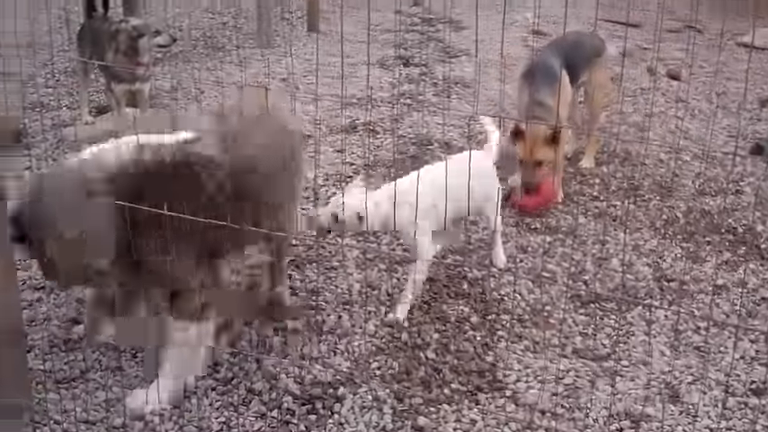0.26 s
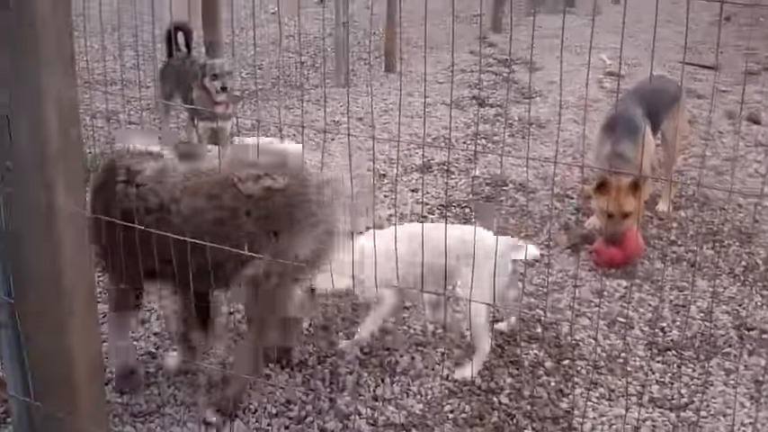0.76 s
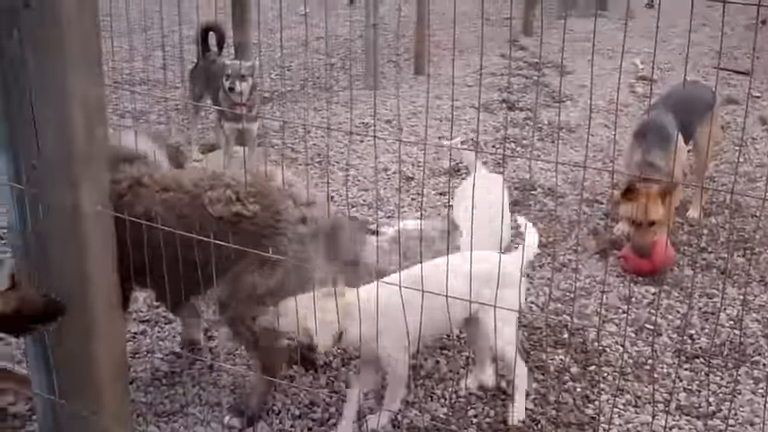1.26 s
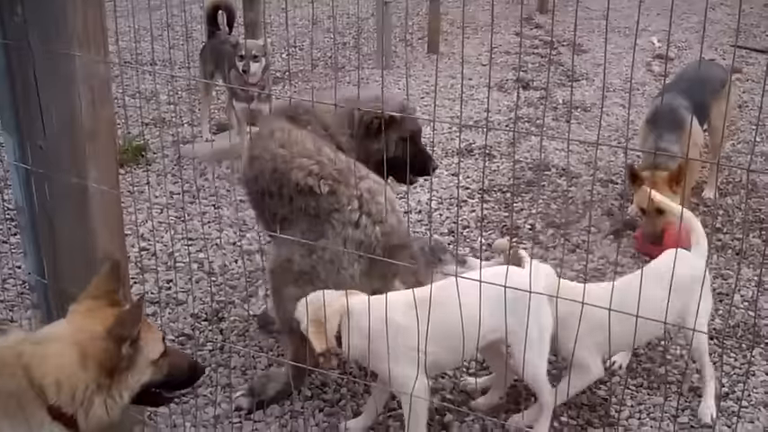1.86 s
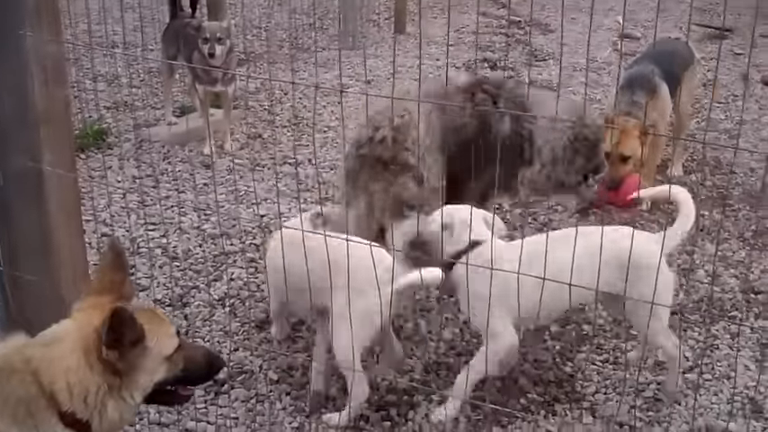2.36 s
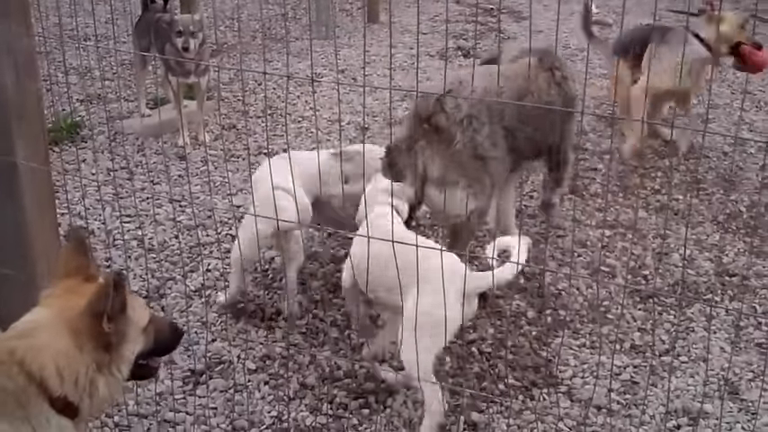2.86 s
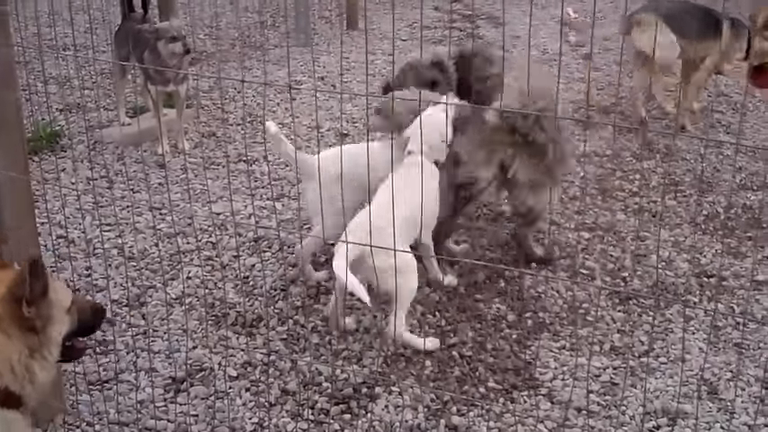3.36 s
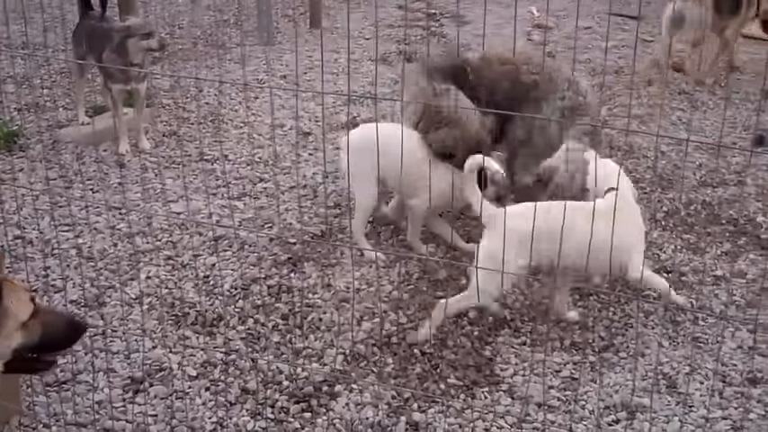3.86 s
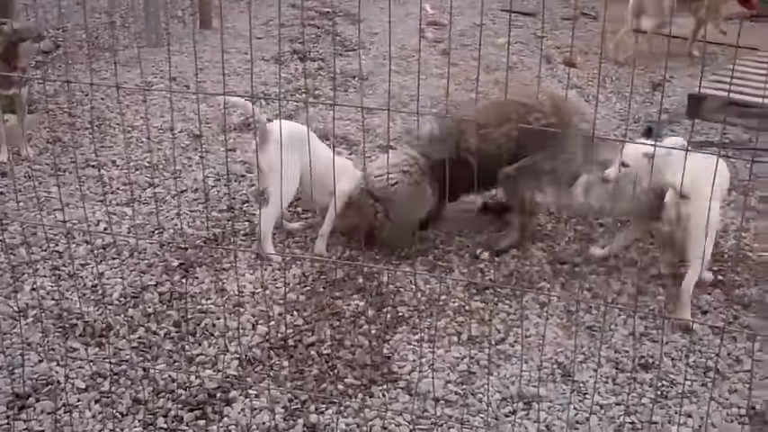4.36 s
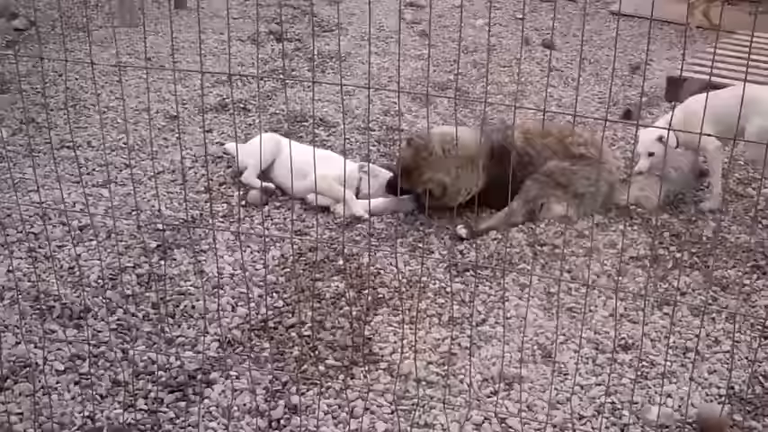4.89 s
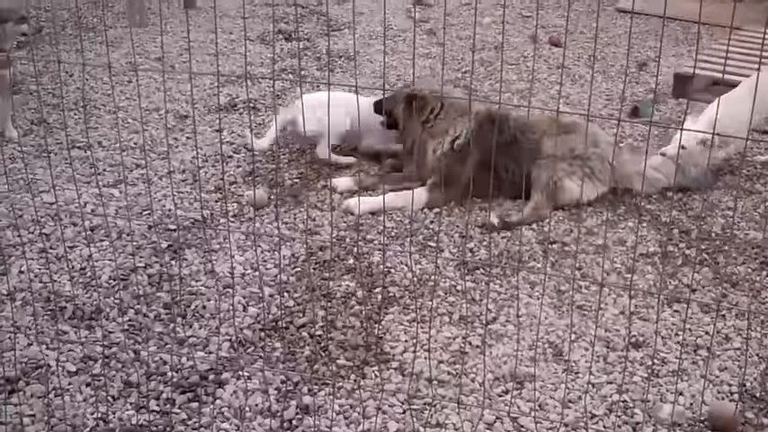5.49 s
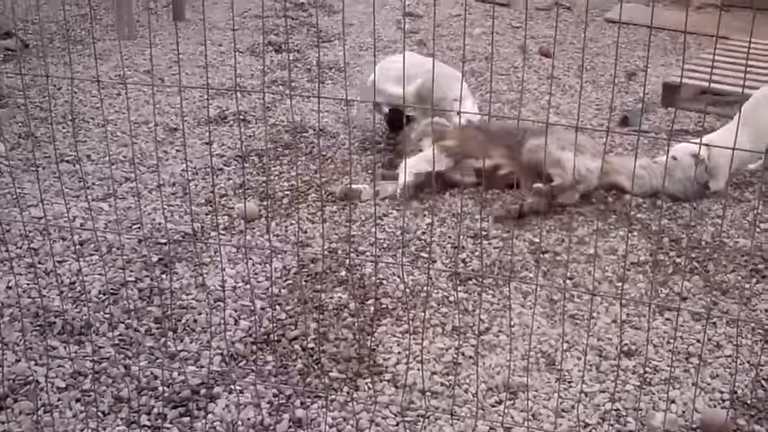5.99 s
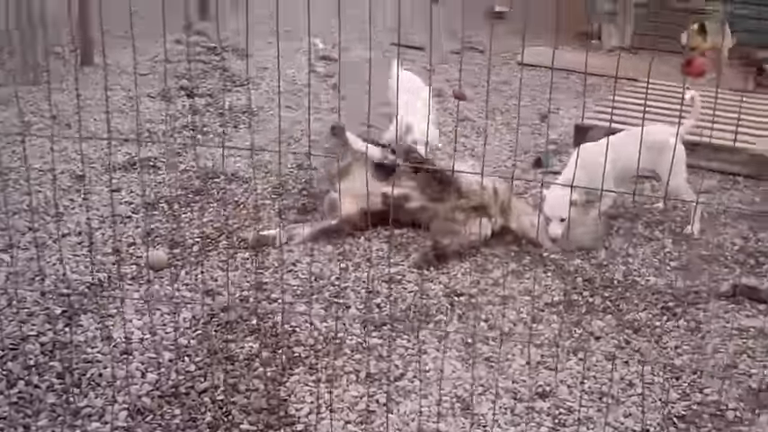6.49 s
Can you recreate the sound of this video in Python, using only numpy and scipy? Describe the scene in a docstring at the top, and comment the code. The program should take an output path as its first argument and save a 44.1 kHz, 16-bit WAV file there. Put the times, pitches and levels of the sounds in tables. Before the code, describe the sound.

Paws scrape and scatter loose gravel in an outdoor pen as young dogs wrestle with a bigger one. A short rough growl comes early, followed by tiny grunts, faint whimpers and a lower, quieter growl. The stones keep ticking and sliding, with soft body thuds and a thin squeak later. A quick yip and a louder, higher yelp come near the end. A handheld stereo microphone catches faint distant air and light wind, its left side brighter.

```python
"""Loose gravel clacks and slides under the paws of young dogs wrestling in an outdoor pen.
The stones are short ringing ticks over coloured noise, gathered into slips and steps.
A big dog growls twice and pups grunt, whimper, yip and yelp: pulses and puffs through a throat.
A thin squeak is a gliding whistle; distant air and light wind at two microphone ports are noise."""
import sys
import numpy as np
from scipy import signal
from scipy.io import wavfile
from scipy.ndimage import uniform_filter1d

SR = 44100
rng = np.random.default_rng(int(sys.argv[2]) if len(sys.argv) > 2 else 0)


def generate_wav(signal):
    """Clip the signal to [-1, 1] and save it as 16-bit WAV at the path in sys.argv[1]."""
    frames = np.transpose(np.atleast_2d(signal))
    scaled = np.clip(frames, -1, 1) * 32767
    pcm = np.round(scaled).astype(np.int16)
    wavfile.write(sys.argv[1], SR, pcm)


N = 297213  # length of the scene in samples

# colour of small stones striking, as the left port hears them: (frequency [Hz], level [dB])
STONE_COLOUR = [(590, -62), (1000, -21), (1600, -20.5), (2100, -14), (4600, -3.5), (5500, -1), (8300, 2),
                (9500, -1), (11200, -18), (12800, -27), (14600, -53)]
# colour of the deeper bed of gravel shifting: (frequency [Hz], level [dB])
BED_COLOUR = [(80, -43), (200, -15), (450, -16), (800, -11), (1500, -4), (2500, -1), (4000, -0.5),
              (7000, -33)]
# resonances of a pup's throat: (frequency [Hz], width [Hz], level [dB], power of the mouth opening it follows)
PUP_RESONANCES = [(500, 290, -4, 0.96), (860, 250, 8.5, 0.96), (1380, 160, -1, 1), (1800, 280, -3, 1)]


def amp(db):
    """Turns decibels into a plain factor."""
    return 10 ** (np.asarray(db) / 20)


def evened(x):
    """Scales a sound to an rms of 1."""
    return x / np.sqrt(np.mean(x ** 2) + 1e-20)


def peaked(rows):
    """Scales each row to a peak of 1."""
    return rows / abs(rows).max(axis=1, keepdims=True)


def read(points, hz):
    """Reads a curve between its points, along a logarithmic frequency scale."""
    f, value = np.transpose(points)
    return np.interp(np.log(hz + 1), np.log(f + 1), value)


def columns(rows, t):
    """Reads every column of a table at the times t; the first column holds its own times."""
    s, *rest = np.transpose(rows)
    return [np.interp(t, s, column) for column in rest]


def add(mix, s, sound):
    """Adds a sound to the mix from s seconds on."""
    part = mix[round(s * SR):][:len(sound)]
    part += sound[:len(part)]


def coloured(x, points):
    """Gives a sound the wanted spectrum along its last axis, with a filter that never acts early."""
    gain_db = np.maximum(read(points, abs(np.fft.fftfreq(8192, 1 / SR))), -100)
    log_gain = np.log(amp(gain_db))
    taps = np.fft.ifft(np.exp(np.conj(signal.hilbert(log_gain)))).real[:min(4096, x.shape[-1])]
    filtered = signal.oaconvolve(np.atleast_2d(x), taps[None], axes=1)
    return filtered[:, :x.shape[-1]].reshape(x.shape)


def chance(top_hz):
    """Slow random curve of rms 1."""
    low_pass = signal.butter(2, top_hz, fs=SR, output="sos")
    return evened(signal.sosfilt(low_pass, rng.standard_normal(N)))


def resonate(x, hz, width):
    """Shifts the frequency hz down to zero, smooths, and shifts back: a resonance of gain 1."""
    turn = np.exp(2j * np.pi * np.cumsum(hz * np.ones(len(x))) / SR)
    r = np.exp(-np.pi * width / SR)
    smooth = signal.lfilter([1 - r], [1, -r], x / turn + 1e-18)
    return 2 * (turn * smooth).real


def air():
    """Distant outdoor wash: steady coloured noise that rises and falls."""
    # colour of the wash: (frequency [Hz], level [dB])
    wash_colour = [(40, -35), (100, -4), (200, -10), (400, -11.5), (700, -3), (1400, -16), (3000, -7.5),
                   (8800, -5.5), (11400, -30), (14000, -73), (15000, -61)]
    # rise and fall of the wash, before its overall lift: (time [s], level [dB])
    swell = [(0.0, -75), (0.62, -67.5), (0.81, -76.5), (1.2, -76), (1.55, -68), (1.86, -80), (2.68, -73.5),
             (2.94, -81.5), (3.2, -78.5), (4.2, -77.5), (4.36, -83.5), (4.6, -77.5), (5.11, -70),
             (5.4, -71.5), (5.55, -78.5), (5.75, -76.5), (6.0, -73.5), (6.15, -82.5), (6.29, -72.5),
             (6.61, -67), (6.74, -67)]
    lift_db = 13
    [swell_db] = columns(swell, np.arange(N) / SR)
    return amp(swell_db + lift_db) * evened(coloured(rng.standard_normal(N), wash_colour))


def wind():
    """Lumpy low pressure, mostly unrelated at the two ports."""
    # strength of the gusts, before each port's own gain: (time [s], level [dB])
    gusts = [(0, -82), (.45, -82), (.81, -82), (1.0, -84.5), (1.93, -77), (2.05, -74.5), (2.83, -70.5),
             (2.95, -80), (3.77, -82), (4.2, -68.5), (4.32, -83), (5.1, -75.5), (5.52, -82), (6.03, -72),
             (6.15, -81), (6.27, -64), (6.38, -73), (6.53, -66), (6.59, -73), (6.68, -52), (6.74, -69)]
    # colour of the wind: (frequency [Hz], level [dB])
    gust_colour = [(15, -1), (40, -2), (65, -9), (100, -17), (200, -38), (400, -70)]
    [gust_db] = columns(gusts, np.arange(N) / SR)

    def port_noise():
        """Low noise whose level wanders slowly."""
        return evened(coloured(rng.standard_normal(N), gust_colour)) * amp(2.7 * chance(2.5))

    left, right = port_noise(), port_noise()
    return amp(gust_db) * np.array([amp(3.5) * left, amp(-2) * (right + .1 * left)])


def squeak():
    """A thin, slightly fuzzy whistle that wavers downward: a sine with narrow noise around it."""
    # path of the whistle: (time [s], pitch [Hz], level [dB])
    path = [(4.848, 8850, -56), (4.862, 8420, -44), (4.872, 7980, -45), (4.897, 8360, -47),
            (4.91, 8040, -39), (4.922, 8050, -52), (4.945, 8100, -64)]
    t = np.arange(path[0][0], path[-1][0], 1 / SR)
    hz, db = columns(path, t)
    whistle = np.sin(2 * np.pi * np.cumsum(hz) / SR)
    fuzz = evened(resonate(rng.standard_normal(len(t)), hz, 260.))
    return t[0], amp(db) * (whistle + .3 * fuzz) * signal.windows.tukey(len(t), .2)


def voice(rough, low_db, chest_db, rows, throat):
    """Uneven pulses and puffs of noise pass a throat that opens and shuts; the chest adds a plain tone."""
    low_sinks = .75  # dB lost by the lowest resonance per dB of effort: harder calls move upward
    usual_effort_db, shimmer_db = -52, 1.6  # shimmer: spread in strength from pulse to pulse
    t = np.arange(rows[0][0], rows[-1][0], 1 / SR)
    effort_db, hz, mouth = columns(rows, t)
    extra_db = effort_db - usual_effort_db
    rough, low_db = np.clip(rough, 0, 1), low_db - low_sinks * extra_db

    wobble = uniform_filter1d(rng.standard_normal(len(t)), 300)
    turns = np.cumsum(hz * (1 + 3.0 * rough * wobble)) / SR  # pulses counted so far
    folds = sum(np.cos(2 * np.pi * k * turns) * (k * hz < 4000) for k in range(1, 40))
    folds = folds * amp(shimmer_db * rng.standard_normal(100)[(turns + .5).astype(int)])
    puffs = np.exp(-(turns % 1) / .3) * rng.standard_normal(len(t))
    drive = (1 - rough) * folds * np.sqrt(hz) / 45 + 3 * rough * evened(puffs)

    out = np.zeros(len(t))
    for k, (f, width, db, power) in enumerate(throat):
        centre = f * mouth ** power
        band = resonate(resonate(drive, centre, 1.7 * width), centre, 1.48 * width)
        out += (-1) ** k * amp(db + low_db * (k == 0)) * band
    # a head radiates little deep bass
    out = signal.sosfilt(signal.butter(4, 100, "high", fs=SR, output="sos"), out)
    chest = amp(chest_db - .5 * low_sinks * extra_db) * np.sin(2 * np.pi * np.cumsum(hz) / SR)
    return t[0], amp(effort_db) * (evened(out) + chest) * signal.windows.tukey(len(t), .08)


def short_call(low_db, chest_db, row, throat):
    """A brief voice: one swell in level over a straight glide in pitch."""
    start, length, db, first_hz, last_hz, mouth, rough = row
    swell_db = 15  # how far the ends lie under the peak
    rows = [(start + u * length, db - swell_db * (2 * u - 1) ** 2,
             first_hz + u * (last_hz - first_hz), mouth) for u in np.linspace(0, 1, num=7)]
    return voice(rough, low_db, chest_db, rows, throat)


def whimpers():
    """High short calls through a pup's throat."""
    # (start [s], length [s], peak effort [dB], first pitch [Hz], last pitch [Hz],
    #  mouth opening [factor], roughness [0-1])
    calls = [(1.405, 0.033, -62.5, 1474, 1460, 1.9, .2), (1.505, 0.031, -65, 1440, 1380, 1.9, .2),
             (6.172, 0.03, -63, 1444, 1260, 1.5, 0.52)]
    return [short_call(-25., -40., row, PUP_RESONANCES) for row in calls]


def grunts():
    """Low short calls through a shut throat, with a stronger chest tone."""
    # (start [s], length [s], peak effort [dB], first pitch [Hz], last pitch [Hz],
    #  mouth opening [factor], roughness [0-1])
    calls = [(.79, 0.022, -60, 276, 267, 1.13, 0.37), (1.0, 0.028, -68, 266, 344, 0.83, 0.37),
             (1.73, 0.023, -58.5, 217, 203, 1, 0.37), (4.538, 0.081, -59.5, 199, 97, 1.05, .14)]
    # (frequency [Hz], width [Hz], level [dB], power of the mouth opening it follows)
    shut_throat = [(273, 146, 19, 0.75), (650, 130, -22, 1)]
    return [short_call(-5., -10., row, shut_throat) for row in calls]


def yips():
    """A pup's quick call: pulses at a few hundred hertz through its small throat."""
    # (roughness [0-1], lowest resonance over the others [dB], chest tone [dB], rows of
    #  (time [s], effort [dB], pitch [Hz], mouth opening [factor]))
    calls = [(.29, -10, -40, [(6.368, -68, 312, 1.42), (6.386, -51, 310, 1.42), (6.4, -52, 305, 1.25),
             (6.413, -50, 300, 1.38), (6.435, -66, 298, 1.38)]), ]
    return [voice(*call, PUP_RESONANCES) for call in calls]


def yelps():
    """A louder, higher call whose mouth opens wide: its resonances climb and fall with the opening."""
    # (roughness [0-1], lowest resonance over the others [dB], chest tone [dB], rows of
    #  (time [s], effort [dB], pitch [Hz], mouth opening [factor]))
    calls = [(.075, 5.2, -40, [(6.462, -59, 392, 0.55), (6.472, -44.5, 392, 0.82), (6.49, -40.5, 414, 0.82),
             (6.504, -40.5, 440, 1.05), (6.526, -40, 444, 1.1), (6.538, -44, 402, 0.87),
             (6.548, -56, 394, 1.17), (6.556, -75, 400, .92)])]
    # (frequency [Hz], width [Hz], level [dB], power of the mouth opening it follows)
    yelp_throat = [(430, 200, 8, .5), (880, 150, 9, 1), (2000, 150, -3, 1.5)]
    return [voice(*call, yelp_throat) for call in calls]


def growls():
    """A big dog's low calls: slow pulses through a long throat."""
    # (roughness [0-1], lowest resonance over the others [dB], chest tone [dB], rows of
    #  (time [s], effort [dB], pitch [Hz], mouth opening [factor]))
    calls = [(0.38, -12, -11.5, [(0.4, -62, 104, 1.0), (0.42, -54, 123, 1.0), (0.448, -55, 151, 1.0),
             (0.462, -50, 162, 0.95), (0.486, -41.5, 162, 1.04), (0.514, -51, 165, 0.95),
             (0.532, -57, 158, 1.1), (0.56, -54, 104, 1.2), (0.585, -60, 101, 1.1), (0.632, -55, 112, 0.9),
             (0.65, -49, 117, 0.92), (0.672, -57, 107, 0.87), (0.688, -56, 99, .85),
             (0.72, -72, 92, 0.84)]), (0.07, -9, -40, [(1.365, -71, 80, 1.05), (1.412, -60, 85, 1.06),
             (1.45, -61, 80, 1.05), (1.525, -62, 79, 1.04), (1.548, -57, 83.5, 1.05), (1.57, -61, 83, 1.04),
             (1.62, -57.5, 78, 1.05), (1.645, -62, 70, 1.05), (1.68, -72, 60, 1.05)])]
    # (frequency [Hz], width [Hz], level [dB], power of the mouth opening it follows)
    big_throat = [(185, 100, 3.5, .5), (790, 130, 2.5, 1), (1090, 120, -1, .3), (590, 84, -10, 1)]
    return [voice(*call, big_throat) for call in calls]


def thuds():
    """A paw or body lands: a soft push, then a slower pull back that dies away."""
    # (time [s], level [dB], frequency that sets the speed [Hz])
    landings = [(1.176, -49, 75), (4.926, -38, 700), (5.353, -33, 500)]
    out = np.zeros(N)
    for s, db, hz in landings:
        u = np.arange(0, 8, 2 * np.pi * hz / SR)
        add(out, s, amp(db) * (1 - u) * np.exp(-u) * np.minimum(4 * u, 1))
    return out


def stone(hz, noise, t60=.005, ring=.6):
    """A wide tick and a short ring at the stone's own pitch, falling by 60 dB in t60 seconds."""
    t = np.arange(noise.shape[-1]) / SR
    return (noise + ring * 2 * np.sin(2 * np.pi * hz * t)) * amp(-60 * t / t60)


def clacks():
    """Each stone ticks, rings, knocks on the bed and scatters a few neighbours."""
    # single stones that strike clearly: (time [s], level [dB], ring pitch [Hz])
    strikes = [(0.0118, -30.5, 9100), (0.0311, -30.0, 8900), (0.08, -32.5, 5510.0), (0.157, -34, 8310.0),
               (0.2171, -19, 9000), (0.2511, -30, 8600), (0.2841, -26.6, 6680.0), (0.3383, -21, 9500),
               (0.3843, -40, 7880.0), (0.4339, -15.5, 6700), (0.46, -22, 8240), (0.643, -25.1, 9260.0),
               (0.6546, -25, 8750), (0.6647, -21, 7620.0), (0.6732, -23, 8800), (0.724, -30, 9430.0),
               (0.7895, -37, 4350.0), (0.8072, -22.5, 8800), (0.823, -22, 9350.0), (0.8419, -31, 8570.0),
               (0.8628, -25, 8100), (0.8813, -25, 7500), (0.943, -27, 8440.0), (1.1822, -16.5, 6430),
               (1.2163, -23.5, 5300), (1.2706, -31.5, 6940), (1.3237, -33, 8350.0), (1.3522, -26, 8480.0),
               (1.3745, -37, 8140.0), (1.39, -35, 6890.0), (1.4828, -24, 6980.0), (1.4972, -29.5, 8230.0),
               (1.5198, -21, 8010.0), (1.5247, -20, 8400), (1.5705, -21, 8050.0), (1.575, -23.7, 7450),
               (1.6074, -24, 9650.0), (1.6293, -22, 8350), (1.6536, -19, 7870), (1.6631, -25, 5500),
               (1.6903, -25.5, 6290.0), (1.7313, -27, 8830.0), (1.747, -34, 7450.0), (1.762, -23, 8530.0),
               (1.7704, -21, 7750), (1.895, -18.5, 8300), (2.0655, -29, 8570.0), (2.0968, -22.5, 9260.0),
               (2.1273, -26, 8700.0), (2.159, -23.5, 7100), (2.186, -27, 8530.0), (2.1977, -28.9, 9260.0),
               (2.2032, -25.4, 7410.0), (2.2146, -28, 7670.0), (2.2254, -27, 6330.0), (2.2473, -33, 8610.0),
               (2.2799, -24, 8030), (2.2897, -30, 8010.0), (2.4017, -25.5, 7020.0), (2.4408, -23, 7840.0),
               (2.4624, -24, 7490.0), (2.4781, -19, 7000), (2.5087, -25.5, 9130.0), (2.5271, -33, 8740.0),
               (2.5449, -30.4, 8230.0), (2.55, -34, 7320.0), (2.5587, -28.6, 8180.0), (2.5688, -24, 9260.0),
               (2.5764, -20.5, 8150), (2.5826, -21, 5940.0), (2.6103, -24, 9220.0), (2.621, -30, 7320.0),
               (2.6346, -24.8, 9470.0), (2.7011, -33, 9150), (2.709, -20.5, 9170.0), (2.723, -22.2, 6680.0),
               (2.771, -31, 8790.0), (2.7795, -33, 7920.0), (2.7873, -34, 6980.0), (2.804, -25.1, 8350.0),
               (2.8144, -20, 8600), (2.8214, -21, 8310.0), (2.828, -27, 7500), (2.8402, -28, 5600.0),
               (2.872, -23, 5560.0), (2.944, -27, 8400), (2.9695, -28, 7670.0), (2.992, -31, 5510.0),
               (3.0115, -31, 8600), (3.054, -32, 9470.0), (3.0593, -20, 9730), (3.1706, -26, 9300),
               (3.2428, -25.5, 9700), (3.2992, -21.5, 8740.0), (3.359, -27, 9170.0), (3.3709, -21.3, 8050),
               (3.401, -24, 8480.0), (3.4794, -31, 8870.0), (3.5304, -33, 9200), (3.6375, -32, 7490.0),
               (3.6506, -28, 8200), (3.709, -34, 8830.0), (3.725, -34, 9560.0), (3.7631, -23.7, 5430),
               (3.77, -28, 6980.0), (3.8213, -27.5, 8270.0), (3.9038, -33, 6460.0), (3.9544, -31, 9100),
               (4.0189, -19.5, 7550), (4.0518, -26.8, 8570.0), (4.0645, -32, 9000.0), (4.071, -24, 6980.0),
               (4.0952, -34.5, 8180.0), (4.1133, -27, 7360.0), (4.1175, -23.8, 9100), (4.1534, -23, 7880.0),
               (4.1713, -23, 8870.0), (4.2124, -35, 8270.0), (4.2218, -26.7, 4820.0), (4.2312, -20, 9250),
               (4.6134, -37, 9100), (4.657, -30.5, 8100), (4.8282, -31.6, 8790.0), (4.869, -20.5, 6240.0),
               (4.9726, -22, 8900), (4.9987, -29.6, 6930.0), (5.0159, -21, 8700), (5.0453, -23, 9000),
               (5.0642, -30.0, 8530.0), (5.099, -25, 8300), (5.1318, -27, 4400), (5.1538, -34, 8740.0),
               (5.1847, -27, 9130.0), (5.2619, -25.5, 6500), (5.2774, -28, 8050.0), (5.3452, -27, 8200),
               (5.3556, -18.5, 9100), (5.5431, -26, 8960.0), (5.5637, -37, 8140.0), (5.5782, -30.2, 7970.0),
               (5.5968, -31, 8350.0), (5.6995, -28.5, 9000), (5.9042, -27, 9520.0), (5.9373, -22, 8940),
               (5.9597, -32, 7750.0), (5.9836, -32, 8740.0), (5.9967, -29, 9260.0), (6.0078, -27, 7490.0),
               (6.014, -27.2, 8830.0), (6.0771, -26, 7100), (6.3282, -24, 8900), (6.4176, -29.5, 8250),
               (6.5621, -24.5, 8500), (6.7005, -30, 8740.0), (6.718, -28, 6560)]
    s, db, hz = np.transpose(strikes)[:, :, None]
    hit, scatter = rng.standard_normal((2, len(strikes), 900))
    neighbours = amp(-12) * stone(hz, scatter, t60=.02, ring=0)
    ring = coloured(stone(hz, hit, t60=.0026, ring=.45) + neighbours, STONE_COLOUR)
    knock = coloured(stone(hz / 3, scatter, t60=0.0077, ring=0.17), BED_COLOUR)
    tick = coloured(stone(hz, hit, t60=0.0016, ring=0), [(8000., -26.5), (11000., 3.0), (14000., -24.5)])
    sounds = amp(db) * (amp(-18.0) * peaked(tick) + peaked(ring) + amp(-21.5) * peaked(knock))
    out = np.zeros(N)
    for start, sound in zip(s[:, 0], sounds):
        add(out, start, sound)
    return out


def lulls():
    """Gain of the ground, which drops quickly and returns after each lull."""
    # the ground falls briefly quiet: (start [s], length [s], level [dB])
    dips = [(4.294, 0.097, -4), (5.358, 0.061, -5.5), (5.686, 0.032, -1.5)]
    t = np.arange(N) / SR
    dip_db = sum(db * ((t > s) & (t < s + length)) for s, length, db in dips)
    return amp(uniform_filter1d(dip_db, 300))


def stirring(t, between_db):
    """Each step swells and dies away, with a short hold, in straight dB slopes; their powers add."""
    # a paw lands or scrapes: (time of the loudest moment [s], stirring [dB], length [s])
    steps = [(0.01, -46.5, 0.06), (0.082, -41.5, 0.025), (0.154, -43.5, 0.18), (0.22, -33.5, 0.1),
             (0.29, -43, 0.96), (0.47, -38.5, 0.24), (0.658, -38.5, 0.21), (0.761, -50.5, 0.22),
             (0.833, -41, 0.19), (0.965, -47.5, 0.15), (1.097, -42.5, 0.19), (1.188, -48, 0.061),
             (1.358, -42, 0.24), (1.417, -40, 0.042), (1.553, -37.5, 0.34), (1.799, -41.5, 0.3),
             (1.902, -52.5, 0.53), (2.06, -37, 0.085), (2.148, -44, 0.31), (2.209, -34, 0.063),
             (2.276, -44.5, 0.14), (2.337, -44.5, 0.21), (2.405, -38, 0.12), (2.474, -36.5, 0.076),
             (2.582, -31, 0.097), (2.607, -36, 0.12), (2.738, -39, 0.36), (2.845, -44.5, 0.21),
             (3.043, -40.5, 0.21), (3.16, -42.5, 0.054), (3.24, -42.5, .06), (3.282, -37, 0.058),
             (3.295, -46.5, 0.57), (3.401, -32.5, 0.056), (3.589, -44, 0.4), (3.768, -42.5, 0.12),
             (4.024, -41, 0.19), (4.148, -42.5, 0.57), (4.228, -35, 0.082), (4.442, -43.5, 0.28),
             (4.715, -46, 0.38), (4.855, -50.5, 0.64), (4.976, -42.5, 0.019), (5.039, -40, 0.15),
             (5.087, -45.5, 0.13), (5.17, -41.5, 0.35), (5.27, -47, 0.36), (5.336, -40, 0.14),
             (5.441, -41.5, 0.11), (5.49, -46, .2), (5.6, -41, 0.1), (5.89, -44.5, 0.26),
             (5.956, -43, 0.32), (6.007, -55, 0.091), (6.065, -44, 0.083), (6.238, -52, 0.028),
             (6.327, -51, 0.031), (6.558, -45.5, 0.058), (6.585, -62, .4), (6.648, -42, 0.099),
             (6.664, -45.5, .08), (6.7, -48, .04), (6.72, -48, .1), (6.74, -37.5, .06)]
    rise, hold = 0.35, 0.021  # share of the length spent digging in; share of each slope held at full
    range_db = 21  # slope of the rise and of the fall, in dB over its share of the length
    s, db, length = np.transpose(steps)[:, :, None]
    u = (t - s) / length
    away = np.where(u < 0, -u / rise, u / (1 - rise))
    step_db = db - range_db * np.maximum(away - hold, 0)
    return 10 * np.log10(amp(2 * step_db).sum(0) + amp(2 * between_db))


def gravel():
    """Avalanches of small stone strikes over a sliding hiss, and the deeper bed shifting under weight."""
    # the scuffle: (time [s], stirring between steps [dB], crunch at the usual stirring [dB],
    #  lift of the treble [dB], lumpiness [0 steady drag - 1 separate slips])
    scuffle = [(0, -52, -51, 0, 0.62), (.7, -71, -54, 5.5, 0.89), (1.5, -48.5, -55.5, 2.5, 0.88),
               (2.5, -58, -56, 1.5, 0.86), (3.1, -52, -57.5, 4.5, 0.76), (3.6, -49.5, -59.5, 6, 0.75),
               (4.35, -57.5, -59, 6.5, 0.77), (5.0, -54.5, -56, 4.5, 0.26), (5.5, -57.5, -57.5, 10, 0.25),
               (5.9, -49.5, -62, 9.5, 0.24), (6.4, -59.5, -58.5, 10, 0.92), (6.74, -49, -47, 3, 0.28)]
    crunch_follows, usual_stir_db = 0.66, -45.5  # dB of crunch per dB of stirring over the usual
    t = np.arange(N) / SR
    between_db, crunch_db, bright_db, lumpy = columns(scuffle, t)
    lumpy = np.clip(lumpy, 0, 1)
    stir_db = np.interp(t, t[::64], stirring(t[::64], between_db[::64]))

    # about 45 slips a second; each starts at once and trickles out
    slips = (rng.random(N) < 45. / SR) * np.minimum(rng.exponential(1, N), 2.)
    clumps = 0.7 + signal.oaconvolve(slips, np.exp(-t[:3000] / .012))[:N]
    clumps = 1.1 * (clumps / 1.1) ** lumpy

    # many small strikes, few large
    spread = amp(4.4 * np.minimum(rng.exponential(1, N), 2.8))
    size = spread * (rng.random(N) < 1000. * clumps / SR)
    which = rng.integers(0, 24, N)  # each strike falls to one of 24 stones
    strikes = np.zeros(N)
    for k, hz in enumerate(np.linspace(1500., 11500., num=24)):
        pebble = stone(hz, rng.standard_normal(300), t60=0.0024, ring=0.45)
        strikes += signal.oaconvolve(size * (which == k), pebble)[:N]
    strikes = evened(strikes)

    slide = evened(clumps ** .6 * rng.standard_normal(N))
    rattle = evened(coloured(strikes + amp(-2 - 5 * lumpy) * slide, STONE_COLOUR))
    treble = coloured(rattle, [(5000., -18.0), (9000., -3.5), (11000., 1.5)])
    shifting = clumps ** 0.61 * rng.standard_normal(N)
    crunch = evened(coloured(amp(-4.5) * strikes + shifting, BED_COLOUR))
    crunch_db = crunch_db + crunch_follows * (stir_db - usual_stir_db)
    return amp(stir_db) * (rattle + (amp(bright_db) - 1) * treble) + amp(crunch_db) * crunch


def ports(x, spread):
    """The right port hears a duller, phase-turned copy; spread-out sources reach it partly by other paths."""
    # likeness of spread-out sound at the two ports: (frequency [Hz], likeness [0-1])
    likeness = [(60, .7), (250, .72), (700, .84), (1000, .89), (2000, .82), (4000, .72), (8000, .58),
                (12000, .5)]
    # the right port is duller: (frequency [Hz], left over right [dB])
    left_over_right = [(60, 2.5), (300, 2.2), (1300, 3.6), (2300, 2.3), (4300, 3), (6000, 6.5), (8500, 14),
                       (10000, 11), (12000, 0), (14700, 0)]
    # phase by which the left port leads: (frequency [Hz], phase [radians])
    left_leads = [(0, 0), (3000, .2), (6630, .4), (8010, .5), (11200, -2.1), (12800, -.4), (14800, -.2)]
    hz, _, (near, wide) = signal.stft(np.array([x, spread]), SR, nperseg=256, noverlap=192)
    same = read(likeness, hz)[:, None]
    # unrelated frames add up to half, so they are doubled
    other = 2 * np.sqrt(1 - same ** 2) * np.exp(2j * np.pi * rng.random(wide.shape))
    turn = np.exp(-1j * read(left_leads, hz)) * amp(-read(left_over_right, hz))
    right = (near + wide * (same + other)) * turn[:, None]
    right = signal.istft(right, SR, nperseg=256, noverlap=192)[1][:N]
    return 1.104 * np.array([x + spread, right])


def scene():
    """Mixes the ground and the dogs, passes both to the two ports and adds the wind there."""
    ground = lulls() * (gravel() + air()) + clacks() + thuds()
    dogs = np.zeros(N)
    for start, call in growls() + yips() + yelps() + grunts() + whimpers() + [squeak()]:
        add(dogs, start, call)
    return ports(dogs, ground) + wind()


def record(dry):
    """The port cavity rings near 9 kHz; then the band limit."""
    edge_hz = 14800
    heard = np.array([x + amp(-17.5) * resonate(x, 9100.0, 620.0) for x in dry])
    low_pass = signal.firwin(511, edge_hz, window=("kaiser", 9), fs=SR)
    return signal.oaconvolve(heard, low_pass[None], "same")


dry = scene()
out = record(dry)
generate_wav(out)
```